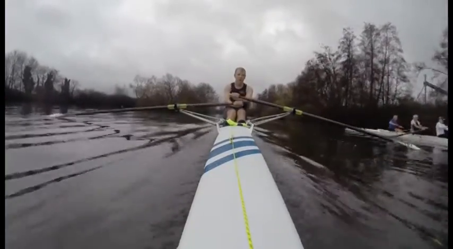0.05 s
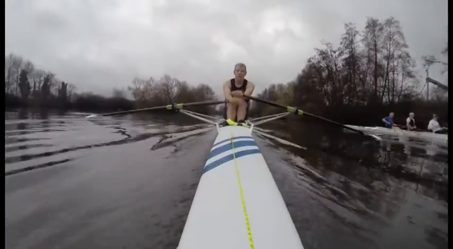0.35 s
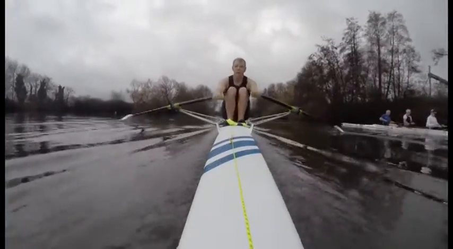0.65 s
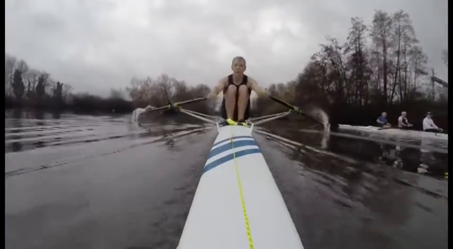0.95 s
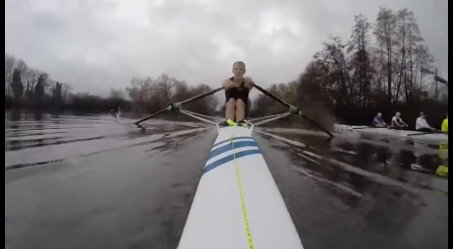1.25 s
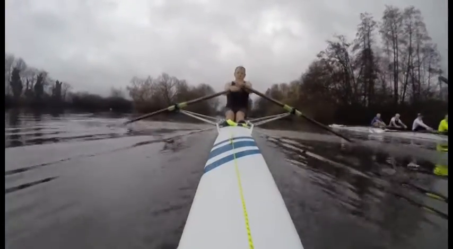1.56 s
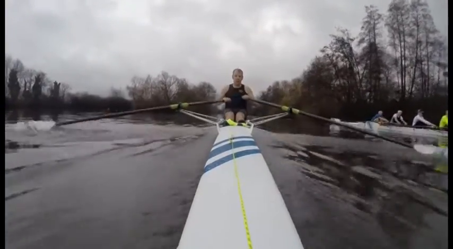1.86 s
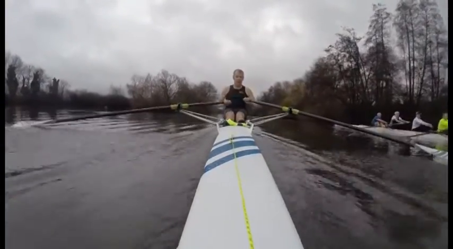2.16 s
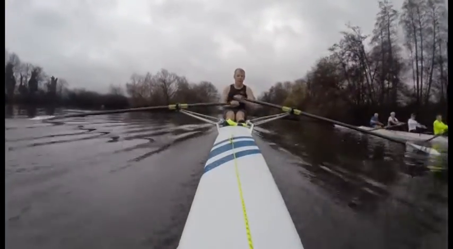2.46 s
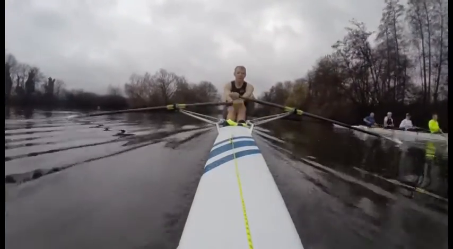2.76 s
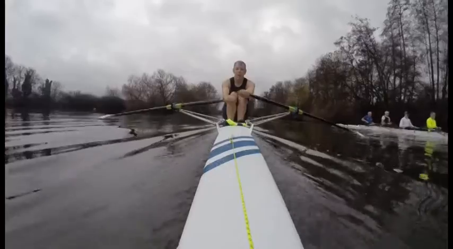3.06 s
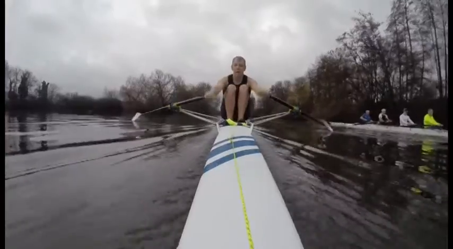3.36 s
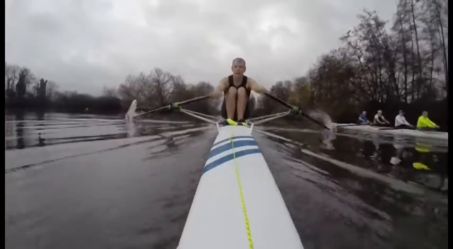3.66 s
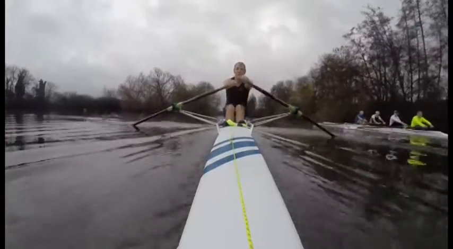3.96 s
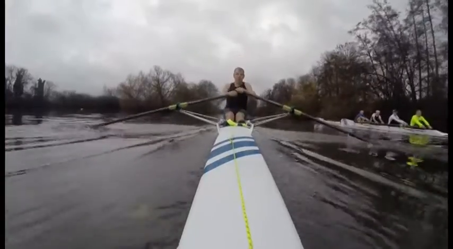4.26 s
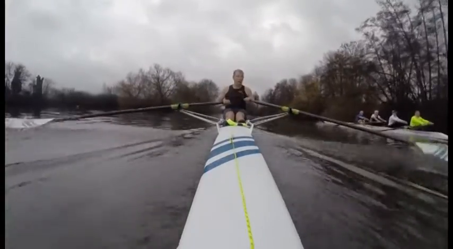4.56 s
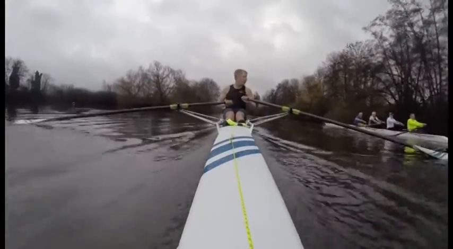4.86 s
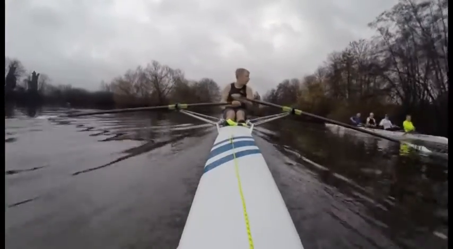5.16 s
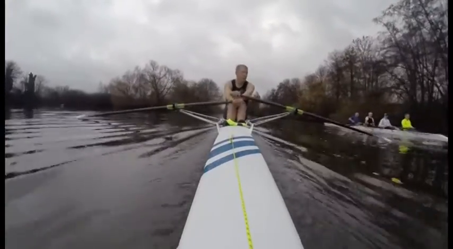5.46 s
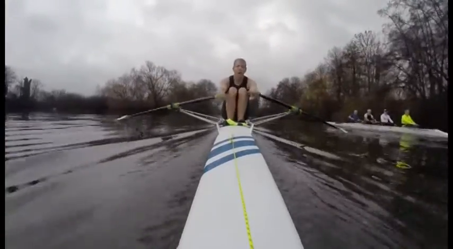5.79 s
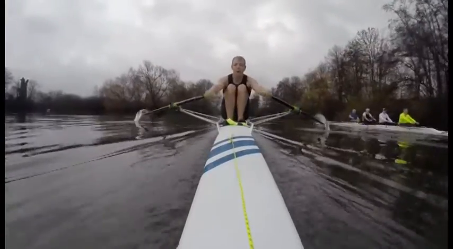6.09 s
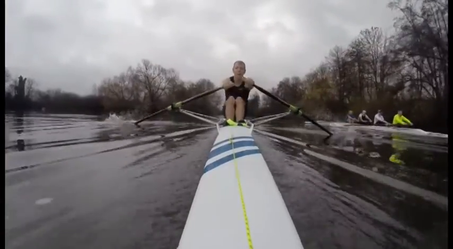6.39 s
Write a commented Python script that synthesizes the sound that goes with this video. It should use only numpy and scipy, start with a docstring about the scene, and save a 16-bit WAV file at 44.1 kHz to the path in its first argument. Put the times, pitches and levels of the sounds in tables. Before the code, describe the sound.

A rowing boat heard close up, with booming oar knocks, a rumbling sliding seat and water bubbling beside the hull.

```python
"""A single scull on a calm river, heard from a cased camera on its stern deck. At first the boat glides:
the seat rumbles on its slide and bubbles resonate in the wake. At the catch, near 1.1 s, the oars knock
in their gates, exciting the modes of the hollow hull, and the blades splash, churn and shed humming
eddies. More knocks mark finish and feather while the wake plops and hisses. A second stroke, from 3.7 s,
finishes hard enough to jolt the camera, and a third begins at 6.3 s, just before the end."""
import sys
import numpy as np
from scipy.fft import rfft, irfft, next_fast_len
from scipy.io import wavfile
from scipy.ndimage import uniform_filter1d, map_coordinates

SR = 44100
rng = np.random.default_rng(int(sys.argv[2]) if len(sys.argv) > 2 else 0)


def wav_record(signal):
    """Record a signal, one row per channel, as 16-bit PCM in the file named by sys.argv[1]."""
    frames = np.transpose(np.atleast_2d(signal))
    bounded = np.clip(frames, -1, 1)
    # unit amplitude maps onto the largest positive 16-bit level
    quanta = np.round(bounded * 32767).astype(np.int16)
    wavfile.write(sys.argv[1], SR, quanta)


N = 287973


def amp(db):
    """Amplitude ratio of a level in decibels."""
    return 10 ** (np.asarray(db) / 20)


def unit(x):
    """Normalisation to rms 1."""
    return x / np.sqrt(np.mean(x ** 2) + 1e-20)


def add(track, s, sound):
    """Superposition of a sound on the track at time s."""
    start = max(round(s * SR), 0)
    track[start:start + len(sound)] += sound[:max(N - start, 0)]


def wobble(rate):
    """Random modulation: a spline through rate Gaussian knots a second."""
    knots = rng.standard_normal(int(N * rate / SR) + 4)
    return map_coordinates(knots, [np.arange(N) * rate / SR])


def swell(start, attack, hold, release):
    """Linear rise, hold, then exponential decay by 20 dB every release seconds."""
    coarse = np.arange(0, N, SR // 1000)
    age = coarse / SR - start
    shape = np.clip(age / attack, 0, 1) * amp(-20 * np.maximum(age - attack - hold, 0) / release)
    return np.interp(np.arange(N), coarse, shape)


def coloured(x, points):
    """Minimum-phase filtering by (frequency [Hz], gain [dB]) points, closing above the last."""
    size = 2 * next_fast_len((len(x) + SR // 4) // 2, real=True)
    hz, db = np.transpose([*points, (2 * points[-1][0], -120)])
    gain_db = np.interp(np.log(np.fft.rfftfreq(size, 1 / SR) + 1), np.log(hz), db)
    cepstrum = irfft(np.log(amp(gain_db)))
    cepstrum[1:size // 2] *= 2  # folding the cepstrum makes the filter causal
    cepstrum[size // 2 + 1:] = 0
    return irfft(rfft(x, size) * np.exp(rfft(cepstrum)), size)[:len(x)]


def rush(points):
    """Spectrally shaped Gaussian noise of rms 1."""
    return unit(coloured(rng.standard_normal(N), points))


def drone(points, span):
    """Narrow-band noise beats quickly; its power is held steady over span seconds."""
    x = rush(points)
    power = np.abs(uniform_filter1d(x ** 2, max(int(span * SR), 1)))
    return x / np.sqrt(power + 1e-6)


def muffled(envelope, points):
    """Source and filter: noise bursts excite a body, which rings briefly after each."""
    white = rng.standard_normal(N)
    return coloured(envelope * white, points) / np.std(coloured(white, points))


def bubble(t, hz, cycles, rise):
    """Minnaert resonance: trapped air rings, down to 1/e after cycles, sharpening near the surface."""
    age = t * hz / cycles
    phase = 2 * np.pi * hz * t * (1 + rise * np.minimum(age, 2) / 2)
    return np.sin(phase) * np.exp(-age) * (1 - np.exp(-t * hz))


def bubbles(count, hz, spread, cycles, size_db):
    """Incoherent sum of many weak bubbles and a few strong ones, at rms 1."""
    start = rng.integers(0, N, (count, 1))
    pitch = hz * np.exp(spread * rng.standard_normal((count, 1)))
    gain = amp(size_db * np.minimum(rng.exponential(size=(count, 1)), 4))
    k = np.arange(SR // 60)
    grains = gain * bubble(k / SR, pitch, cycles, rise=.015)
    return unit(np.bincount((start + k).ravel(), grains.ravel(), N)[:N])


def strays(count, db, hz, spread):
    """Uniformly scattered drops, as rows (time [s], level [dB], pitch [Hz])."""
    return [(when * N / SR, db + 6 * (size - .5), hz * np.exp(spread * (2 * pitch - 1)))
            for when, size, pitch in rng.random((count, 3))]


# strokes, the first already under way:
# (catch time [s], entry splash [dB], drive strength [dB], finish strength [dB], slide strength [dB])
STROKES = [(-1.47, -32, 0, -2, -1.5), (1.0882, -31.5, -.5, 0, .5), (3.678, -35, -1.5, 2.5, 1.5),
           (6.261, -28, 0, 0, 0)]
def stroke_level(glide_db, swells, vigour=0):
    """Powers add: a steady glide plus drive, finish and slide swells; vigour weights their strengths."""
    power = amp(glide_db) ** 2
    for catch, _, *strength_db in STROKES:
        for (delay, attack, hold, release, db), extra_db in zip(swells, strength_db):
            if catch + delay < N / SR:
                surge = amp(db + vigour * extra_db) * swell(catch + delay, attack, hold, release)
                power = power + surge ** 2
    return np.sqrt(power)


def drive(bury_s=.04, load_s=.04, pull_s=.17, ease_s=.17):
    """Load on the blades: it rises to 1 once they are buried, then eases to 0."""
    ages = (np.arange(N) / SR - bury_s - catch for catch, *_ in STROKES)
    return sum(np.clip(np.minimum(age / load_s, 1 - (age - pull_s) / ease_s), 0, 1) for age in ages)


# spray and foam, dulled by the camera case: (frequency [Hz], gain [dB])
FIZZ = [(1800, -40), (3000, 3), (3600, -1.5), (4150, 3.5), (4600, 2), (5600, 2.5), (6400, -0.5),
        (7200, -11), (8200, -17.5), (9300, -9), (10500, -17.5), (12000, -20.5), (15000, -38)]
# drops falling from the blades into the river: (time [s], level [dB], pitch [Hz])
RIVER_DROPS = [(1.894, -33, 5650), (2.0004, -39, 4100), (3.0849, -38.5, 4200), (4.463, -38.5, 4180),
               (5.213, -41, 4580), (5.268, -40, 4090), (6.0048, -39, 3100), (6.0593, -40, 4080),
               (6.2603, -40, 4200)]
# drops landing on deck and case: (time [s], level [dB])
DECK_DROPS = [(.299, -49), (.546, -48), (1.1704, -45), (1.23, -45), (1.249, -47), (1.411, -47), (1.44, -47),
              (1.464, -46), (1.494, -48), (1.7135, -48), (1.912, -46), (2.5806, -45), (2.9577, -49),
              (3.757, -44), (3.8527, -45), (4.038, -46), (4.5775, -47), (5.7983, -42.5), (6.323, -45),
              (6.3429, -30)]
def spray():
    """Drop impact: each drop ticks as it lands, and on water it also traps a ringing bubble."""
    ticks, plinks, t = np.zeros(N), np.zeros(N), np.arange(SR // 20) / SR
    for s, db, hz in RIVER_DROPS + strays(count=14, db=-46, hz=4150, spread=.08):
        add(plinks, s, amp(db - 1) * (1 - np.exp(-t / .0007)) * bubble(t, hz, cycles=12, rise=0))
        add(ticks, s, amp(db - 6 - 60 * t / .03) * (1 - np.exp(-t / .002)))
    for s, db in DECK_DROPS:
        add(ticks, s, amp(db + 5 - 60 * t / .018) * (1 - np.exp(-t / .0015)))
    patter = unit(coloured(bubbles(count=3500, hz=9500, spread=.3, cycles=2.5, size_db=3), FIZZ))
    shower = sum(swell(catch + .08, attack=.04, hold=.28, release=.2) for catch, *_ in STROKES)
    return plinks + muffled(ticks, FIZZ) + amp(-62) * shower * patter


# passband of the camera case: (frequency [Hz], gain [dB])
CASE_BAND = [(700, -62), (1050, -18.5), (1280, -6.5), (1400, -8), (1520, 1.5), (1650, -5.5), (1880, -12.5),
             (2100, -5.5), (2290, -4), (2490, -2.5), (2740, -21.5), (2810, -12.5), (2930, -34.5),
             (5000, -67)]
# bubbling and foam hiss: (delay after catch [s], attack [s], hold [s], release [s], level [dB])
BUBBLE_SWELLS = [(.03, .1, .14, .4, -42.5), (.72, .06, .45, .85, -44.6), (1.62, .36, .22, .5, -42.2)]
HISS_SWELLS = [(.08, .26, .08, 1.8, -60.7), (.74, .06, .34, 1.0, -58.3), (1.5, .48, .12, .6, -59.7)]
BUBBLE_GLIDE_DB, HISS_GLIDE_DB = -50.5, -67.3
def wake():
    """Bubble-cloud noise: clumps burst along the hull, babbling less while the blades pull; foam hisses."""
    clumps = wobble(28)
    swarm = unit(coloured(bubbles(count=3000, hz=1900, spread=.3, cycles=6, size_db=3.2), CASE_BAND))
    babble_gain = stroke_level(BUBBLE_GLIDE_DB, BUBBLE_SWELLS, vigour=.5)
    babble_gain *= amp(.1 + 1.6 * clumps + .8 * wobble(70))
    babble = babble_gain * unit(swarm + amp(-1) * rush(CASE_BAND))
    plinks = bubbles(count=900, hz=4150, spread=.15, cycles=9, size_db=4)
    hiss_gain = stroke_level(HISS_GLIDE_DB, HISS_SWELLS) * amp(.9 + 1.2 * clumps + .9 * wobble(130))
    hiss = hiss_gain * (rush(FIZZ) + amp(-7.5) * plinks)
    return (1 - .58 * drive()) * babble + hiss


# the largest bubbles beside the stern: (time [s], level [dB], pitch [Hz], splash level [dB])
PLOPS = [(0.3919, -29, 2200, -41), (0.5718, -22, 2490, -35), (0.622, -29, 1550, -42),
         (0.739, -31, 1460, -44), (0.8185, -25, 2400, -39), (0.995, -34, 2380, -42),
         (1.879, -28, 2280, -36), (1.908, -26, 2470, -36), (1.9763, -29, 2180, -38),
         (2.0003, -22, 2480, -32), (2.19, -28, 2050, -38), (2.25, -32, 1660, -44), (2.329, -19, 2200, -31),
         (2.415, -21, 2150, -33), (2.437, -28, 2020, -42), (2.5096, -26, 2020, -37),
         (2.583, -35, 1560, -37), (2.683, -33, 1680, -48), (2.802, -26, 2440, -42), (2.87, -28, 1630, -48),
         (3.106, -30, 2300, -42), (3.157, -31, 1530, -46), (3.228, -27, 1480, -42),
         (3.3412, -24, 2160, -39), (3.488, -29, 2400, -41), (4.9311, -28, 2200, -39),
         (5.0454, -30, 2480, -44), (5.086, -24.5, 1450, -43), (5.158, -29, 1300, -50),
         (5.303, -24, 2200, -34), (5.403, -24.5, 1550, -48), (5.5854, -28, 2345, -34),
         (5.657, -30, 1586, -36), (5.876, -21.5, 1520, -35), (5.9394, -31, 1350, -39),
         (6.0633, -31, 1423, -35)]
PLOP_GAP_S, PLOP_LOSS_DB = .009, 6.5  # from one bubble to the next
def plops():
    """Air entrainment: a wavelet closes with a splash and traps a bubble, then two weaker ones."""
    tones, splash, t = np.zeros(N), np.zeros(N), np.arange(SR // 10) / SR
    onset = 1 - np.exp(-t / .0009)
    for s, db, hz, splash_db in PLOPS:
        add(tones, s, amp(db - .8) * onset * bubble(t, hz, cycles=12, rise=.02))
        for k, (late, detune) in enumerate(rng.uniform(-1, 1, (2, 2)), 1):
            ring = bubble(t, hz * (1 + .05 * detune), cycles=10, rise=.02)
            add(tones, s + PLOP_GAP_S * (k + .3 * late), amp(db - PLOP_LOSS_DB * k) * onset * ring)
        add(splash, s, amp(splash_db - 60 * t / .06))
    return tones + muffled(splash, CASE_BAND)


# rush behind a blade, gurgle through the hull, hull panels: (frequency [Hz], gain [dB])
WHOOSH = [(350, -43.5), (560, -6.5), (700, -3), (780, -5.5), (855, 3.5), (940, -13), (1060, -20),
          (1280, -5), (1400, -4.5), (1530, 4.5), (1680, -7.5), (1880, -14.5), (2310, -4.5), (2480, -5),
          (2760, -26), (4500, -69.5)]
CHURN = [(300, -55.5), (510, -11.5), (585, -1.5), (625, -5), (675, 3.5), (730, -2.5), (790, -7), (855, 0.5),
         (940, -15), (1100, -13.5), (1800, -65.5)]
PANELS = [(120, -66.5), (215, -4.5), (255, 0), (305, -5.5), (345, 4.5), (410, -4.5), (500, -13), (900, -72)]
# churning and wavelet slap: (delay after catch [s], attack [s], hold [s], release [s], level [dB])
CHURN_SWELLS = [(.02, .07, .13, 1.4, -46.7), (.72, .07, .35, .4, -50.5), (1.65, .42, .12, .55, -48.5)]
SLAP_SWELLS = [(0.0, .06, .2, .25, -40.5), (.45, .1, .7, .3, -44), (1.65, .25, .33, .22, -43)]
CHURN_GLIDE_DB, SLAP_GLIDE_DB = -55, -49
def blades():
    """Flow noise: each blade slaps in and drags a hollow rush; wavelets gurgle and slap at the shell."""
    entry = sum(amp(db) * swell(s, attack=.002, hold=0, release=.033) for s, db, *_ in STROKES)
    pull = drive() * stroke_level(BUBBLE_GLIDE_DB, BUBBLE_SWELLS) * amp(3.8 + wobble(25))
    gurgle = unit(coloured(bubbles(count=1500, hz=703.5, spread=.35, cycles=4.4, size_db=2.4), CHURN))
    churn = stroke_level(CHURN_GLIDE_DB, CHURN_SWELLS) * unit(gurgle + .95 * rush(CHURN))
    slap_gain = stroke_level(SLAP_GLIDE_DB, SLAP_SWELLS) * amp(1.2 + 1.5 * wobble(12))
    slap = slap_gain * drone(PANELS, span=.12)
    return muffled(entry + pull, WHOOSH) + churn + slap


# eddies behind the blades: (time [s], hold [s], pitch [Hz], level [dB])
EDDIES = [(1.205, .08, 113, -17), (1.23, .09, 150, -22), (1.345, .035, 160, -19), (3.935, .03, 159, -16.5),
          (6.322, .085, 113, -9)]
def eddies():
    """Vortex shedding: eddies peel off a loaded blade at a wavering rate and make the oar hum."""
    out = np.zeros(N)
    for s, hold, hz, db in EDDIES:
        shedding_hz = hz * (1 + .02 * wobble(45))
        hum = unit(np.sin(2 * np.pi * np.cumsum(shedding_hz) / SR))
        out += amp(db + 1.5 * wobble(40)) * swell(s, attack=.03, hold=hold, release=.14) * hum
    return out


# lowest resonances of the shell; oar shafts and riggers: (frequency [Hz], gain [dB])
SHELL = [(40, -59), (76, -26), (87, 1), (98, -6.5), (112, 3), (128, -10.5), (150, -16.5), (260, -81.5)]
SHAFTS = [(90, -69), (135, -15.5), (152, -1), (164, -3.5), (180, -15), (200, -6.5), (222, -21.5),
          (400, -81)]
# seat rumble and shaft drone: (delay after catch [s], attack [s], hold [s], release [s], level [dB])
RUMBLE_SWELLS = [(0.0, .08, .13, .3, -19.3), (.62, .08, .7, .6, -25.7), (1.7, .25, .42, .3, -23.8)]
SHAFT_SWELLS = [(-.03, .04, .1, .35, -27), (.48, .1, .62, .4, -37), (1.75, .45, .15, .25, -35)]
RUMBLE_GLIDE_DB, SHAFT_GLIDE_DB = -30.5, -42.5
def hull():
    """Forced vibration: the rolling seat and the loaded oars keep the shell droning."""
    rumble = amp(2.2 * wobble(12) - 1.4) * drone(SHELL, span=.07)
    shafts = amp(1.8 * wobble(12)) * drone(SHAFTS, span=.068)
    return (stroke_level(RUMBLE_GLIDE_DB, RUMBLE_SWELLS, vigour=1) * rumble
            + stroke_level(SHAFT_GLIDE_DB, SHAFT_SWELLS, vigour=.3) * shafts)


# shaking of the camera mount: (time [s], level [dB])
SWAY = [(0.0, -29), (1.05, -32), (1.28, -22), (1.81, -31), (2.46, -27), (2.7, -35), (4.6, -23), (4.83, -39),
        (4.89, -19.5), (5.19, -22.5), (5.34, -34), (5.74, -24), (5.88, -32), (6.12, -24), (6.23, -34),
        (6.5, -20)]
# response of the mount: (frequency [Hz], gain [dB])
MOUNT = [(8, -29), (18, 0), (26, -2), (36, -7), (45, -10), (70, -2), (100, -31), (200, -110)]
def mount_sway(resonance_hz=26.3):
    """Base excitation: the boat shakes the camera mount around its low resonance."""
    sway_db = np.interp(np.arange(N) / SR, *np.transpose(SWAY))
    shake = unit(np.sin(2 * np.pi * np.cumsum(resonance_hz + 1.5 * wobble(9)) / SR))
    return amp(sway_db - .5 + .6 * wobble(9)) * (shake + amp(-4.5) * rush(MOUNT))


# the hardest knocks reaching the mount: (time [s], level [dB])
JOLTS = [(4.872, -16), (4.922, -20)]
def jolts(hz=60, t60=.3):
    """Damped free vibration: a hard knock makes the camera thud on its mount."""
    out, t = np.zeros(N), np.arange(SR // 2) / SR
    for s, db in JOLTS:
        add(out, s, amp(db - 60 * t / t60) * (1 - np.exp(-t / .004)) * np.sin(2 * np.pi * hz * t))
    return out


# resonance of the oar's plastic collar: (frequency [Hz], gain [dB])
COLLAR = [(300, -51), (500, -10), (580, -2.5), (665, 1.5), (740, -7), (830, -15.5), (1100, -22),
          (1800, -69.5)]
BOUNCE_S, BOUNCE_LOSS_DB = .017, 7  # from one bounce to the next
def rattle(knocks):
    """Inelastic rebound: the loose collar bounces on the gate at each knock, and the panels shudder."""
    clack, crack, shudder, t = np.zeros(N), np.zeros(N), np.zeros(N), np.arange(SR // 4) / SR
    for s, _, _, knock_db, clack_db, crack_db in knocks:
        add(shudder, s, amp(knock_db - 16 - 60 * t / .25) * (1 - np.exp(-t / .006)))
        add(clack, s, amp(clack_db - 17.5 - 60 * t / .3))
        for k, late in enumerate(rng.uniform(-.4, .4, 4)):
            when = s + BOUNCE_S * (k + late * (k > 0))
            loss_db = BOUNCE_LOSS_DB * k
            add(clack, when, amp(clack_db - 7 - loss_db - 60 * t / .035))
            add(crack, when, amp(crack_db - 5 - loss_db - 60 * t / .04) * (1 - np.exp(-t / .0012)))
    return muffled(clack, COLLAR) + muffled(crack, CASE_BAND) + muffled(shudder, PANELS)


# modes of hull and riggers: (frequency [Hz], level [dB], 60 dB decay time [s])
HULL_MODES = [(86, -14, .28), (109.97, -4, .28), (133.9, -8, 0.33), (161.4, -9, 0.33), (199.3, -12, 0.2),
              (259.7, -12, 0.18), (288, -6.5, 0.23), (349, -4, 0.15), (389, -7.5, .12), (456, -13, 0.11),
              (578, -9, 0.069), (621.5, -7, .055), (669.7, -3, 0.07), (894, -21, 0.091),
              (1292, -9.5, 0.016), (1512, -5, .05), (2275, -7.5, .04), (2444, -17, .03)]
# centres of the five registers, boom to crack: (frequency [Hz])
REGISTERS_HZ = [112, 165, 330, 660, 1700]
# oars striking their gates: (time [s], boom [dB], drone [dB], knock [dB], clack [dB], crack [dB])
KNOCKS = [(1.088, -10, -10, -20.5, -23.5, -28), (1.162, -6, -14, -22, -41, -52),
          (1.191, -4, -12, -27, -40, -29.5), (1.654, -26, -24, -24.5, -31.5, -30),
          (1.735, -13, -28, -40, -50, -55), (1.812, -7, -12, -20, -24.5, -27.5),
          (1.834, -14, -18, -15, -40, -43), (1.879, -18, -24, -25, -40, -30),
          (2.094, -26, -19, -26, -21, -50), (2.218, -19, -14, -22.5, -39, -43),
          (2.255, -24, -22, -26, -42, -50), (3.395, -13, -10, -30, -33, -34),
          (3.478, -22, -18, -31, -38, -45), (3.626, -20, -9.5, -30, -38, -55),
          (3.68, -19, -13, -27, -33, -40), (4.166, -30, -30, -36, -34, -55),
          (4.236, -15, -22, -24, -35, -35), (4.432, -8, -14, -18, -20.5, -25),
          (4.452, -6, -16, -22, -34, -33), (4.55, -13, -32, -42, -45, -55),
          (4.594, -22, -34, -40, -38, -33), (4.706, -14, -20, -25, -24.5, -31),
          (4.727, -9, -13, -19, -42, -41), (4.757, -16, -20, -25, -33, -34),
          (4.785, -10, -20, -26, -45, -50), (4.815, -11, -22, -29, -48, -55),
          (4.869, -10, -11, -8.5, -18, -25), (4.912, -6, -21, -17, -40, -50),
          (4.962, -15, -26, -28, -48, -55), (6.04, -15, -18, -28, -35, -36),
          (6.259, -9, -6, -20, -18.5, -23), (6.322, -9, -10, -17.5, -30, -30)]
def gates():
    """Modal ringing with dispersion: after each knock, bending waves bring the treble before the boom."""
    out, t = np.zeros(N), np.arange(SR // 2) / SR
    for s, *strength_db in KNOCKS:
        for hz, db, t60 in HULL_MODES:
            shape = (1 - np.exp(-t * hz / 1.27)) ** 2 * amp(-60 * t / t60)
            force_db = np.interp(np.log(hz), np.log(REGISTERS_HZ), strength_db) + rng.normal(0, 2.0)
            ring = shape / shape.max() * np.sin(2 * np.pi * hz * rng.normal(1, .011) * t)
            add(out, s + .7 / hz, amp(force_db + db - 2) * ring)  # each mode starts 0.7 cycle late
    return out


def scene():
    """Free-field superposition of boat and water, close by, in one channel."""
    boat = gates() + rattle(KNOCKS) + jolts() + hull() + mount_sway()
    return (boat + eddies() + blades() + wake() + plops() + spray())[None]


# the camera's own hiss: (frequency [Hz], gain [dB])
SELF_NOISE = [(500, -1.5), (9000, 1.5), (13500, -2.5), (15500, -20)]
BAND_LIMIT_HZ = 15100
def record(dry):
    """Self-noise and band limiting: the camera adds a faint hiss and cuts the highest treble."""
    size = next_fast_len(N + SR // 4)
    heard = dry + amp(-72.5) * rush(SELF_NOISE)
    passband = np.fft.rfftfreq(size, 1 / SR) < BAND_LIMIT_HZ
    return irfft(rfft(heard, size) * passband, size)[:, :N]


dry = scene()
out = record(dry)
wav_record(out)
```